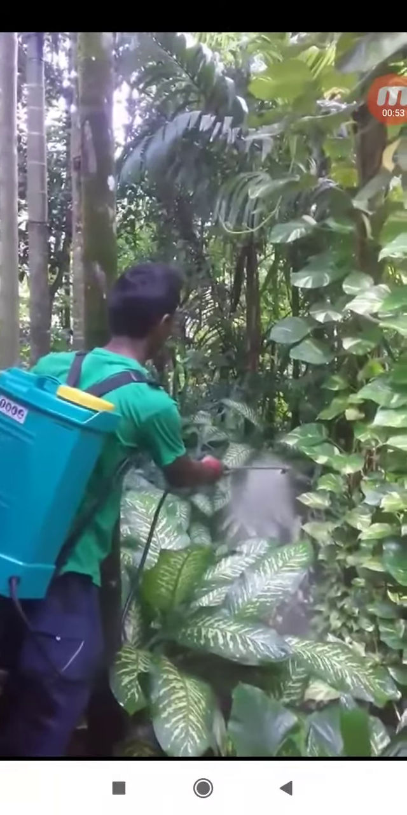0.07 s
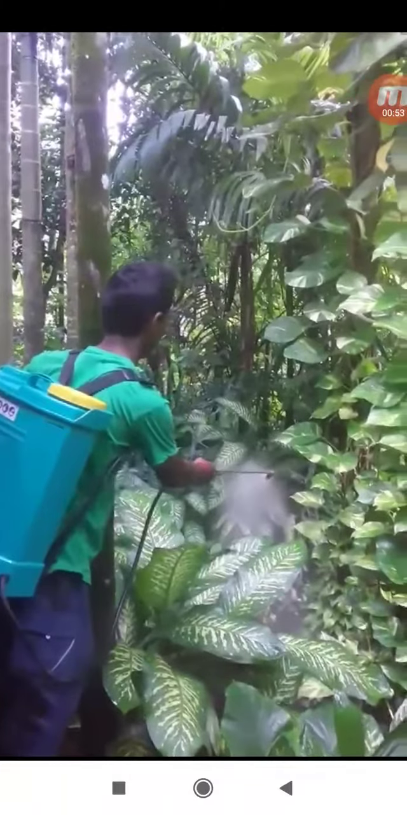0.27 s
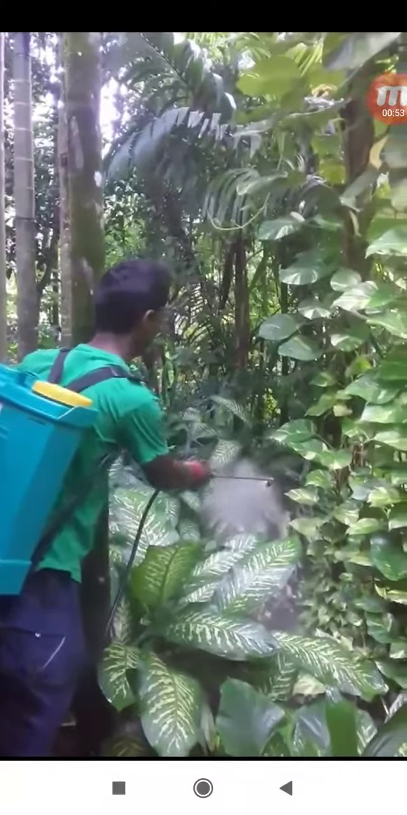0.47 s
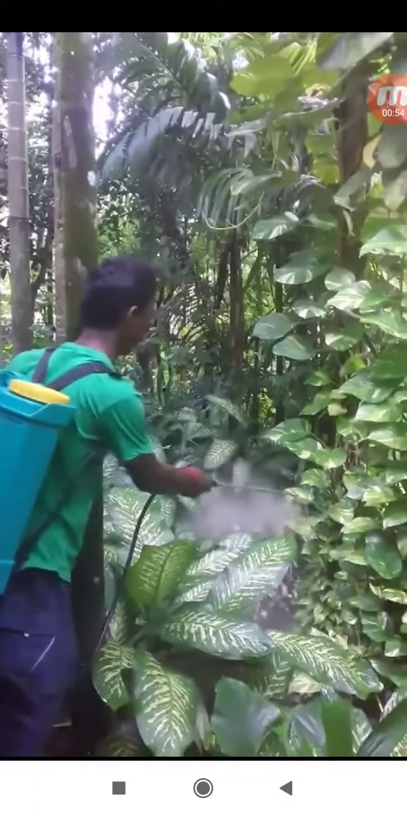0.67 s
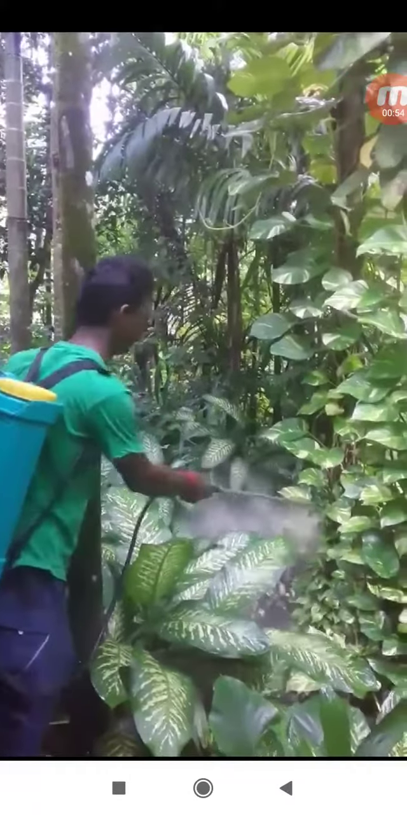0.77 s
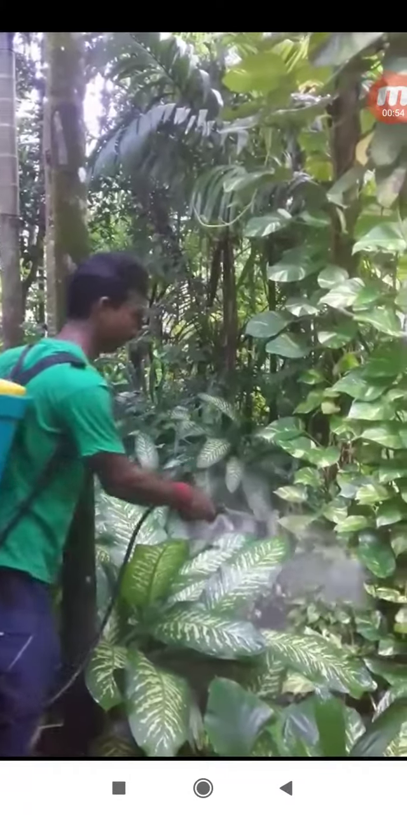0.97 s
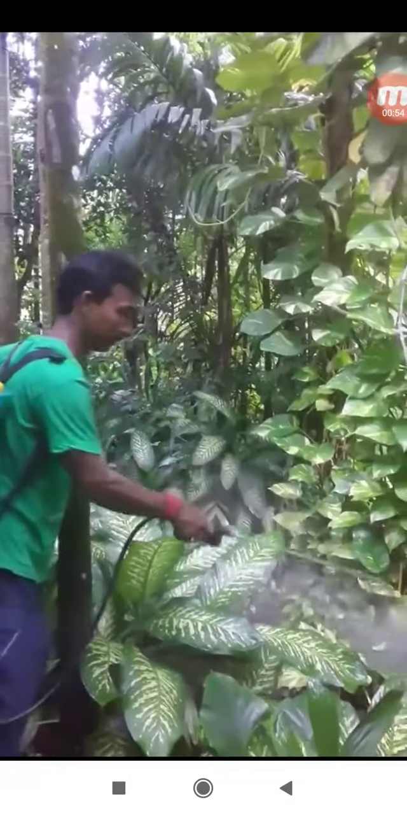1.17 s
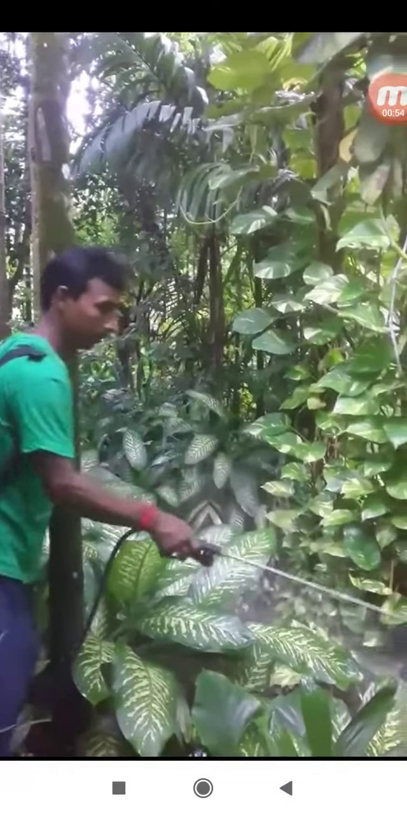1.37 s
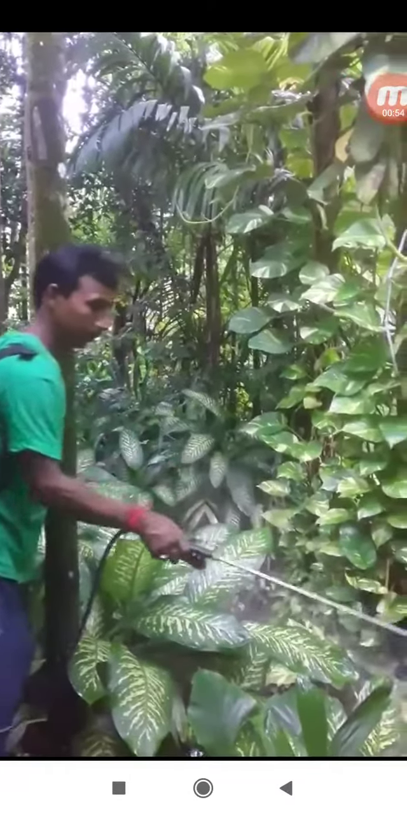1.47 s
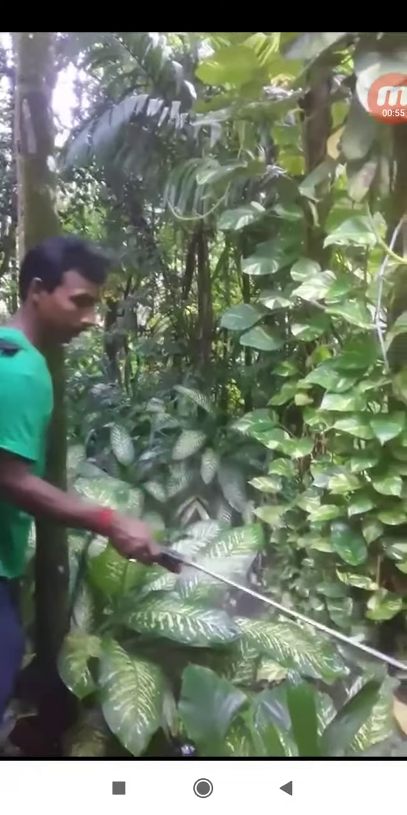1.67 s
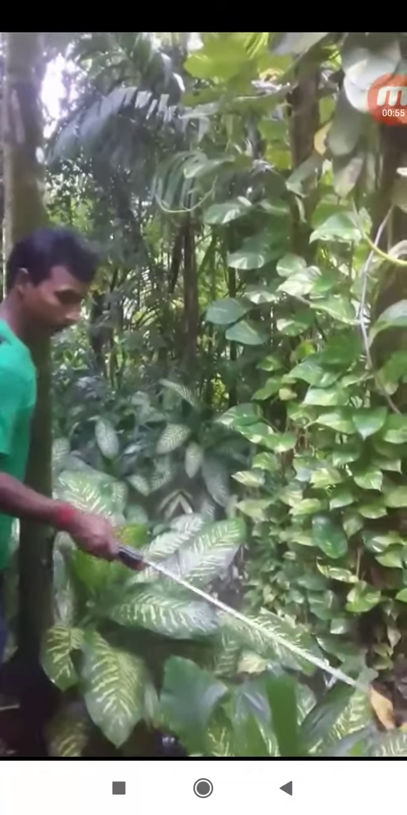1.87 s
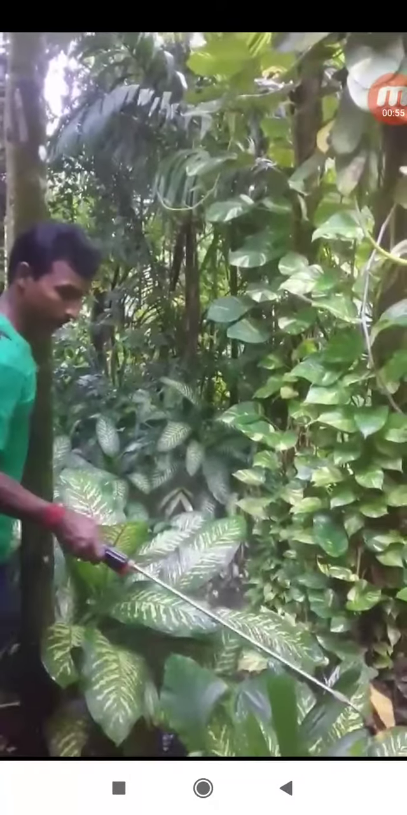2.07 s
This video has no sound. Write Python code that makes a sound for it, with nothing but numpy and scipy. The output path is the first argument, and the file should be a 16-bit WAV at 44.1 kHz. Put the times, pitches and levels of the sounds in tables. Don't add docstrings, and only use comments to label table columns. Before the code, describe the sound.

A battery backpack sprayer buzzes steadily and hisses over leaves, then knocks to a stop

```python
import sys
import numpy as np
from scipy import signal
from scipy.fft import rfft, irfft, next_fast_len
from scipy.io import wavfile
from scipy.ndimage import uniform_filter1d, map_coordinates

SR = 44100
rng = np.random.default_rng(int(sys.argv[2]) if len(sys.argv) > 2 else 0)


def gain_from_db(level_db):
    decades = np.asarray(level_db, float) / 20
    return 10 ** decades


def wav_out(sig):
    wavfile.write(sys.argv[1], SR, np.round(np.clip(np.atleast_2d(sig).T, -1, 1) * 32767).astype(np.int16))


N = 93536
RUN_HZ = 45.97


def unit(x):
    return x / np.sqrt(np.mean(x ** 2) + 1e-20)


def along(points, hz):
    f, v = np.transpose(points)
    return np.interp(np.log(hz + 1), np.log(f + 1), v)


def curves(rows):
    s, *cols = np.transpose(rows)
    return [np.interp(np.arange(N) / SR, s, c) for c in cols]


def wobble(rate):
    knots = rng.standard_normal(int(N * 100 / SR))
    return map_coordinates(knots, [np.arange(N) * min(rate, 90) / SR])


def filtered(x, gain):
    m = 2 * next_fast_len(N // 2 + 4096)
    cep = irfft(np.log(gain(np.fft.rfftfreq(m, 1 / SR)) + 1e-6), m)
    cep[1:m // 2] *= 2
    cep[m // 2 + 1:] = 0
    return irfft(rfft(x, m) * np.exp(rfft(cep)), m)[:N]


def patchy(patchy_db):
    z = signal.stft(rng.standard_normal(N + 512), nperseg=256)[2]
    field = uniform_filter1d(rng.standard_normal(z.shape), size=5, axis=0)
    field = uniform_filter1d(field, size=12, axis=1)
    return unit(signal.istft(z * gain_from_db(patchy_db * unit(field)), nperseg=256)[1][:N])


def pump():
    # start_s, shaft_hz (turns per second), level_db
    motor = [
        (0, 46.06, -48.5),
        (1.67, 45.95, -48.5),
        (1.7, 45.6, -52),
        (1.745, 43.5, -44.5),
        (1.79, 38.7, -57),
        (1.81, 38.7, -76),
        (1.84, 37.5, -69),
    ]
    # start_s, bearing (0 tank towards us to 3 away)
    turning = [
        (.2, 0),
        (.6, 1.5),
        (.8, 0.84),
        (1.14, 2),
        (1.52, 3),
    ]
    shaft_hz, level_db = curves(motor)
    turned, = curves(turning)
    t = np.arange(N) / SR
    level = gain_from_db(level_db - 400 * np.clip(t - motor[-1][0], 0, None))
    start_rad = -1.0
    angle = start_rad + 2 * np.pi * np.cumsum(shaft_hz) / SR
    buzz = tank_buzz(shaft_hz, angle, turned)
    return level * (gain_from_db(6.5) * buzz + gain_from_db(2) * valve_gurgle(shaft_hz, angle, turned))


def tank_buzz(shaft_hz, angle, turned):
    # towards_db, little_turned_db, half_turned_db, away_db
    order_levels = [(-32.0, -30.0, -32.0, -31.0), (-24.0, -22.0, -20.0, -17.0),
                    (-16.0, -17.0, -17.0, -17.0), (-15.0, -16.0, -15.0, -18.0),
                    (-19.0, -18.0, -21.0, -24.0), (-49.0, -33.0, -23.0, -18.0),
                    (-14.0, -19.0, -20.0, -18.0), (-9.0, -8.0, -12.0, -16.0), (-24.0, -15.0, -9.0, -7.0),
                    (-14.0, -13.0, -15.0, -15.0), (-14.0, -19.0, -31.0, -26.0), (-12.0, -6.0, -2.0, -10.0),
                    (-11.0, -13.0, -5.0, -8.0), (-16.0, -19.0, -18.0, -11.0), (-19.0, -13.0, -18.0, -16.0),
                    (-21.0, -16.0, -17.0, -12.0), (-8.0, -5.0, -16.0, -13.0), (-4.0, -1.0, -14.0, -12.0),
                    (2.0, 0.0, -2.0, -10.0), (0.0, -2.0, -6.0, -8.0), (-2.0, -1.0, -7.0, -4.0),
                    (-1.0, -1.0, 0.0, -3.0), (-21.0, -18.0, -14.0, -5.0), (-23.0, -17.0, -13.0, -19.0),
                    (-7.0, -7.0, -7.0, -10.0), (-15.0, -17.0, -13.0, -14.0), (-16.0, -11.0, -5.0, -8.0),
                    (-22.0, -27.0, -16.0, -14.0), (-12.0, -10.0, -9.0, -22.0), (-15.0, -21.0, -12.0, -22.0),
                    (-21.0, -23.0, -15.0, -16.0), (-12.0, -11.0, -15.0, -6.0), (-22.0, -21.0, -16.0, -18.0),
                    (-18.0, -17.0, -18.0, -17.0)]
    sides, order = np.transpose(order_levels), np.arange(5, 39)
    slowing_db = 5 * np.clip(RUN_HZ - shaft_hz, 0, None)
    buzz = np.zeros(N)
    for k in order:
        place = k * np.minimum(shaft_hz / RUN_HZ, 1)
        db = 0
        for i, side in enumerate(sides):
            nearness = np.clip(1 - abs(turned - i), 0, 1)
            db = db + nearness * np.interp(place, order, side)
        upper = k > 11
        level = gain_from_db(db - upper * slowing_db + 1.23 * wobble(5.03))
        smear_rad = np.pi * (.48 if upper else -.27) * k * k
        path_rad = .35 * rng.normal() + .35 * wobble(3)
        buzz += level * np.cos(k * angle + smear_rad + path_rad)
    return buzz


def valve_gurgle(shaft_hz, angle, turned):
    # pitch_hz, level_db (per Hz)
    liquid = [(150, -25.5), (300, -21), (520, -16.5), (720, 0), (860, -11.5), (1050, 6), (1300, -10),
              (1700, -4.5)]

    def colour(hz):
        octaves_above = np.log2(np.maximum(hz / liquid[-1][0], 1))
        return gain_from_db(along(liquid, hz) - 38.4 * octaves_above)
    gate = 1 + 0.17 * np.cos(2 * angle)
    since_slap_s = (angle / (2 * np.pi) - .92) % 1 / shaft_hz
    gate = gate + .7 * np.clip(turned - 1, 0, None) * np.exp(-since_slap_s / .004)
    return unit(filtered(gate * patchy(patchy_db=0.0), colour))


def run_down():
    # start_s, peak_db, pitch_hz
    knocks = [(1.677, -34, 1170), (1.687, -30, 780), (1.7015, -29.5, 1065), (1.7113, -27.5, 832),
              (1.7235, -26, 1077), (1.7335, -27, 793), (1.7455, -28, 1080), (1.7585, -31, 783),
              (1.7785, -32.5, 776), (1.7825, -35.5, 1037), (1.801, -39, 713.6), (1.813, -43, 756),
              (1.829, -43.5, 790)]
    fade_s, rise_s = 0.043, 0.00068
    out = np.zeros(N)
    for s, db, hz in knocks:
        t = np.clip(np.arange(N) / SR - s, 0, None)
        ring = np.sin(2 * np.pi * hz * t)
        ring += 0.38 * np.sin(2 * np.pi * 1.7 * hz * t)
        ring += 0.28 * np.sin(2 * np.pi * 0.73 * hz * t)
        out += gain_from_db(db - 60 * t / fade_s) * (1 - np.exp(-t / rise_s)) * ring
    return out


def spray():
    # start_s, flow_db, brightness_db
    flow = [(0, -37.5, 3), (.2, -37, 2), (.48, -37, 3.5), (.64, -37, 2), (.84, -38, 4), (1, -36, 3),
            (1.22, -37.5, 4), (1.36, -35, 3), (1.6, -33.5, 4), (1.67, -35, 3.5), (1.695, -43, 6),
            (1.76, -45, 5), (1.84, -55, 11.5), (1.95, -57, 8.5), (2.03, -55.5, 10), (2.12, -55, 9)]
    # pitch_hz, level_db (per Hz)
    jet_colour = [(300, -22.5), (800, -43.5), (1500, 0), (2300, -3), (4300, 3), (10000, -0.5), (15000, 5.5)]
    flow_db, bright_db = curves(flow)
    drops_per_s = 1500
    drops = unit((rng.random(N) < drops_per_s / SR) * rng.choice([-1, 1], N))
    flutter = gain_from_db(0.49 * wobble(9.1) + 0.29 * wobble(29.8))
    source = flutter * (patchy(patchy_db=0.5) + gain_from_db(-10.5) * drops)
    jet = filtered(source, lambda hz: gain_from_db(along(jet_colour, hz)))

    def fine_band(hz):
        return 1 / np.sqrt((1 + (6000 / (hz + 1)) ** 8) * (1 + (hz / 12500) ** 16))
    fine = filtered(jet, fine_band)
    top_hiss = irfft(rfft(jet) * (np.fft.rfftfreq(N, 1 / SR) > 13600), N)
    top_left = gain_from_db(2.5 * np.minimum(flow_db + 45, 0))
    jet = jet - (1 - top_left) * top_hiss
    return gain_from_db(flow_db + 5.5) * (jet + (gain_from_db(bright_db) - 1) * fine)


def creak():
    # start_s, pitch_hz, level_db
    slips = [
        (1.82, 415, -68),
        (1.86, 436.5, -57),
        (1.9, 445, -53.5),
        (1.945, 440, -60.5),
        (1.97, 457, -80),
    ]
    hz, db = curves(slips)
    angle = 2 * np.pi * np.cumsum(hz * (1 + 0.013 * wobble(39.94))) / SR
    t = np.arange(N) / SR
    sounding = (t > slips[0][0]) * (t < slips[-1][0])
    tone = gain_from_db(-11) * np.sin(angle) + np.sin(2 * angle)
    return sounding * gain_from_db(db + 1.2 * wobble(46.8)) * tone


def handle():
    # start_s, peak_db, length_s, centre_hz
    clicks = [
        (1.974, -44, 0.019, 1450),
        (1.9883, -39, 0.001795, 6200),
        (1.99, -31.5, .002, 9600),
        (1.9933, -33, 0.00097, 9500),
        (2.005, -38, 0.001597, 9500),
        (2.0065, -26, 0.0021, 9700),
        (2.0135, -36, 0.0044, 9900),
        (2.017, -43, 0.0081, 10490),
        (2.0206, -41, 0.0062, 9850),
    ]
    # start_s, level_db
    snap = [
        (2.00697, -6),
        (2.00751, -1),
        (2.00797, -12),
        (2.00866, -9),
    ]
    # pitch_hz, level_db
    lever = [(200, -20.5), (900, 4), (2350, -3), (3200, 14.5), (4150, -1.5), (5100, 0), (5800, 1),
             (12000, -18)]
    out, blows, t = np.zeros(N), np.zeros(N), np.arange(N) / SR
    for s, db, length, centre_hz in clicks:
        u = np.clip((t - s) / length, 0, None)
        burst = np.clip(5 * u, 0, 1) * np.exp(-u ** 2.9) * np.sign(rng.standard_normal(N))
        narrow = filtered(burst, lambda hz: 1 / (1 + (np.log((hz + 1) / centre_hz) / 0.23) ** 2))
        out += gain_from_db(db + 13.0) * narrow
    for s, db in snap:
        blows[round(s * SR)] = gain_from_db(db)
    return out + filtered(blows, lambda hz: gain_from_db(along(lever, hz)))


def garden():
    # pitch_hz, level_db (per Hz)
    air = [(40, -14), (120, -25), (300, -23), (500, -5), (900, 8.5), (1600, 1), (5500, -13), (14000, -24)]
    rustle = unit(filtered(patchy(patchy_db=2), lambda hz: gain_from_db(along(air, hz))))
    return gain_from_db(-53 + 1.5 * wobble(11.48)) * rustle


def scene():
    return np.tile(pump() + run_down() + spray() + creak() + handle() + garden(), (2, 1))


def roll_off(x):
    return signal.sosfilt(signal.butter(12, 15630, fs=SR, output="sos"), x)


def record(dry):
    # pitch_hz, width_hz, level_db
    cavities = [(2317, 565, 9), (2955, 440, -3.5), (4223, 660, 9), (5965, 580, -4), (6330, 1040, -8),
                (8634, 980, -5), (9656, 600, -2.5), (10865, 900, -7), (12260, 930, -18), (13500, 700, -23),
                (15000, 2000, -28)]
    # pitch_hz, level_db (per Hz)
    self_noise = [(25, 2), (90, 5), (300, 7.5), (1500, 5), (3400, 19.5), (6500, 23), (12500, -4),
                  (14200, -25)]

    def colour(hz):
        skirt = 4.7
        peaks = 0
        for c, w, db in cavities:
            peaks = peaks + gain_from_db(2 * db) / (1 + (2 * (hz - c) / w) ** 2 / skirt) ** skirt ** 1.35
        plateau = 1 / (1 + (hz / 1770) ** 60)
        valley = gain_from_db(2 * -21.5) / (1 + (hz / 13500) ** 16)
        notch = 1 - 0.41 / (1 + ((hz - 1833) / 50) ** 2)
        edges = (1 + (220 / (hz + 1)) ** 6) * (1 + (hz / 15680) ** 400)
        return notch * np.sqrt((peaks + plateau + valley) / edges)
    hiss = gain_from_db(-59) * unit(filtered(patchy(patchy_db=4.0), lambda hz: gain_from_db(along(self_noise, hz))))
    mix = np.tile(filtered(dry[0], colour) + hiss, (2, 1))
    return roll_off(mix)


dry = scene()
out = record(dry)
wav_out(out)
```